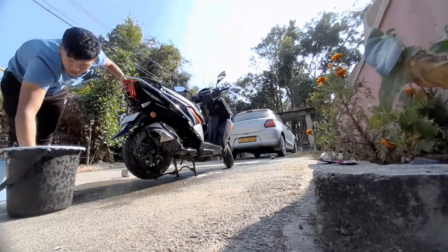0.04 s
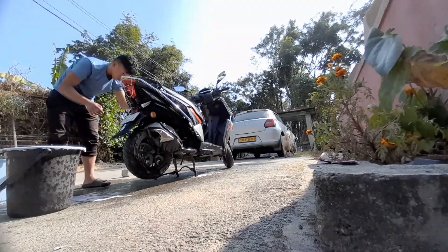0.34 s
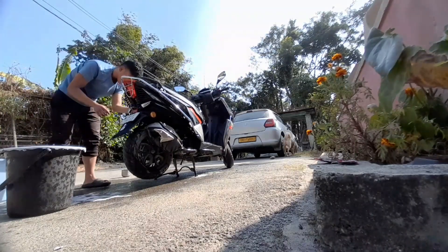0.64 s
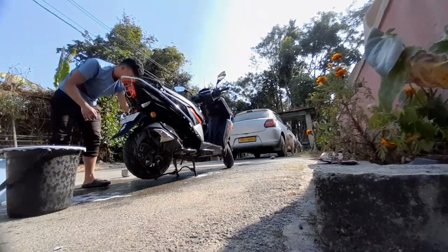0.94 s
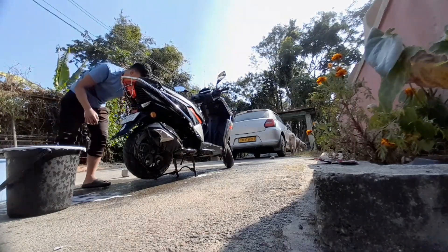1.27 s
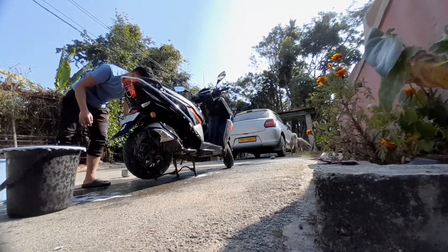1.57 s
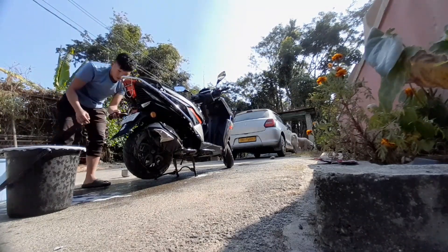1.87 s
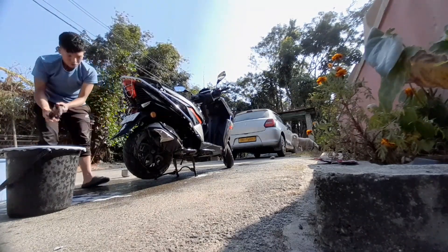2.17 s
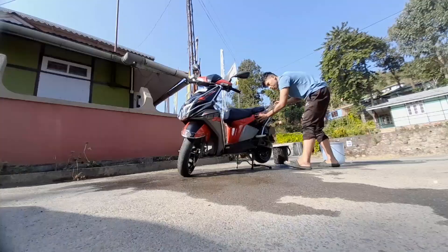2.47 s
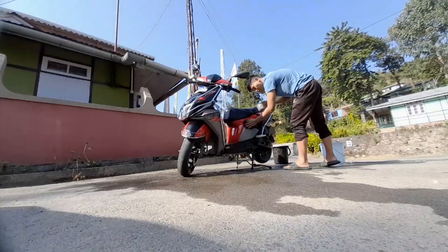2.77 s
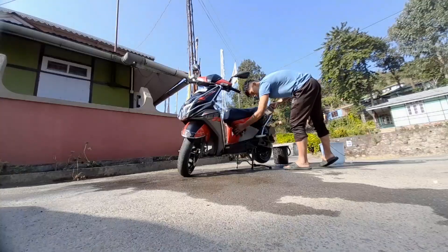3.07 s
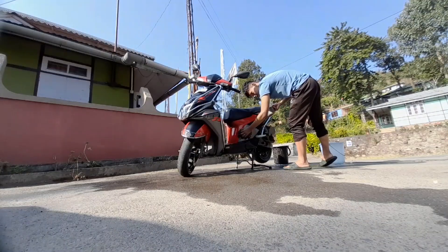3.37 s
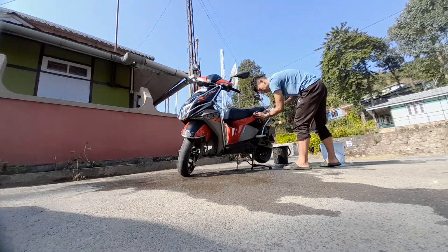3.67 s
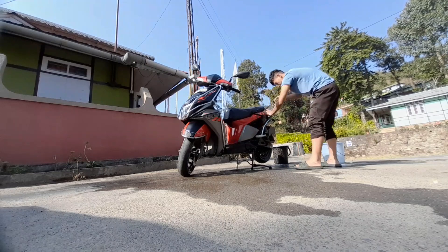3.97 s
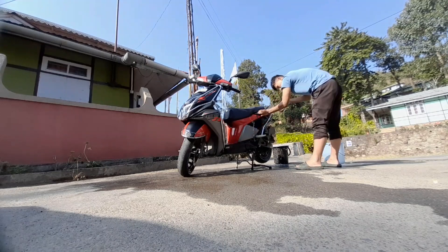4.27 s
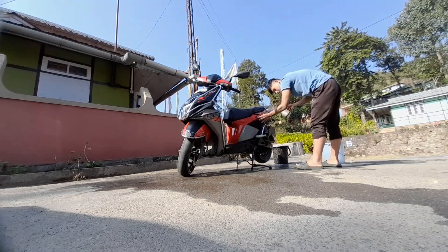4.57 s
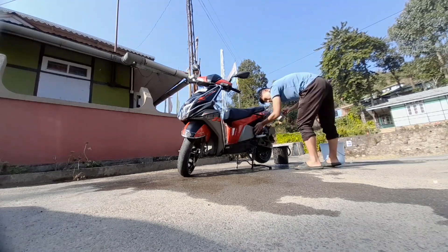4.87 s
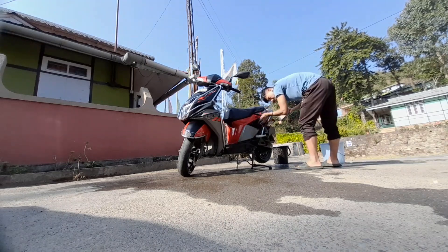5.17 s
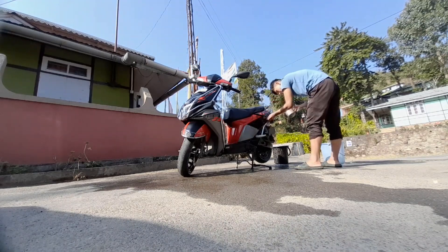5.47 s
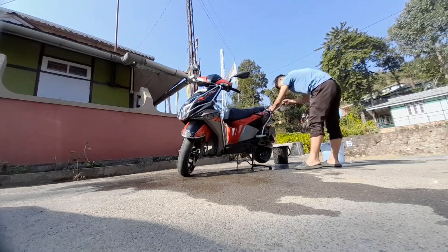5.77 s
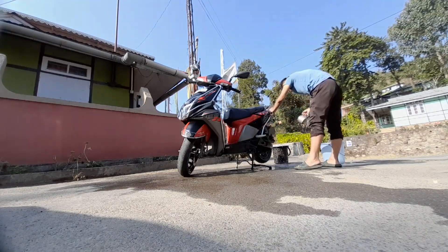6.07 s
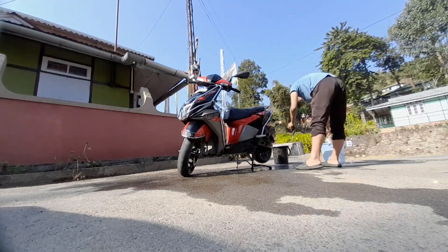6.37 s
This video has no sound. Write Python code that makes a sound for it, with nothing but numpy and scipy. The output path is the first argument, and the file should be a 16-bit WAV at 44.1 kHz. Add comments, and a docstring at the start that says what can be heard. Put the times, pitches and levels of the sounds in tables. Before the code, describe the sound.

A short churn of water in a nearby bucket opens a scooter wash in the open air. A hand then softly knocks and rubs the panels while drops tick and an insect buzzes faintly far off. Traffic cuts in abruptly and dominates: one deep engine slowly gathering speed, then a higher pulsing one, both over tyre noise. Small splashes hit the concrete meanwhile, and the engines recede at the end.

```python
"""Roadside scooter wash

A scooter is washed by hand, in three shots joined by hard cuts. Water sloshes and glugs in a near
bucket; then, in the quiet, drips tick, the wet panels are bumped and rubbed, and a far insect buzzes.
Last, two motor vehicles rumble past on exhaust tones and tyre rush while water splatters on concrete."""
import sys
import numpy as np
from scipy import signal
from scipy.fft import rfft, irfft
from scipy.io import wavfile

SR = 44100
rng = np.random.default_rng(int(sys.argv[2]) if len(sys.argv) > 2 else 0)


def pcm_store(signal):
    """Save signal as 16-bit PCM."""
    levels = np.round(np.clip(np.atleast_2d(signal), -1, 1) * 32767)
    wavfile.write(sys.argv[1], SR, levels.astype(np.int16).T)


N = 292383
T, HZ = np.arange(N) / SR, np.fft.rfftfreq(N, 1 / SR)
CUT_QUIET_S, CUT_ROAD_S = 0.2235, 2.438

# Water rocking in the bucket: crest time in seconds, period in seconds, mean level in dB, swing in dB.
SLOSH = (0.6, -0.2, -41, 1)
# Short ringing tones: the one at 1.062 s is the low body of the loudest panel bump, the rest are water
# glugs. Each row: start in seconds, level in dB, starting pitch in Hz.
SHORT_TONES = [(0.002, -40, 382), (0.067, -41.5, 243), (0.196, -44.5, 459), (0.939, -47, 728),
               (1.062, -37, 192.4), (1.378, -49, 621), (4.922, -35.5, 498), (5.949, -38, 570),
               (6.056, -42, 595)]
# Dull bumps and rubs on the panels. Each row: start in seconds, level in dB, ring in Hz,
# length in seconds, relative thud level in dB.
BUMPS = [(0.3, -66.5, 774, 0.12, -16), (0.697, -47.5, 423, 0.029, -3), (0.716, -57, 392, .07, 9),
         (0.782, -52, 460, 0.047, -8), (0.91, -49.5, 405, .036, -1), (0.962, -54.5, 433, 0.052, -6),
         (1.008, -50, 243, .055, -10), (1.04, -41.5, 247, 0.022, -1.5), (1.046, -47, 527, 0.062, -2),
         (1.069, -41.5, 202, 0.032, -8), (1.133, -52, 320, 0.048, -4), (1.191, -54.5, 335, 0.048, 5.5),
         (1.232, -55, 370, 0.041, 5.5), (1.331, -56, 357, 0.062, 3), (1.376, -55, 520, 0.027, -8),
         (1.468, -60, 364, 0.031, -12), (1.571, -53, 378, 0.026, 3), (1.588, -47.5, 158, 0.028, 6),
         (1.674, -60.5, 566, 0.053, -4), (2.337, -61, 279, 0.0086, 9), (5.226, -45, 865, 0.043, -10),
         (6.449, -55.5, 810, 0.019, -12)]
# Resonances of the plastic. Each row: centre in Hz, width in Hz, gain in dB.
PANEL_MODES = [(1270, 280, -2), (1690, 390, -0.5), (3800, 700, -4)]
# Water hitting concrete. Each row: start in seconds, level in dB, length in seconds,
# relative spray level in dB.
SPLATS = [(0.052, -46.5, 0.0091, -6.5), (0.22, -50.5, 0.0066, -3), (3.962, -51.5, 0.067, -6),
          (4.307, -55, 0.017, 2), (4.327, -45.5, 0.049, -4), (4.344, -46, 0.0058, -1.5),
          (4.392, -50.5, .034, 0.5), (4.47, -48, 0.014, 1), (4.481, -47, .026, -4),
          (4.618, -52, 0.041, -10), (4.784, -58, .04, -3), (4.882, -59.5, .02, -0.5),
          (6.084, -42, 0.01, -13), (6.094, -40, 0.026, -8), (6.115, -53.5, 0.08, -3), (6.232, -62, .058, 0),
          (6.349, -56, 0.043, -10)]
# The clearest drips. Each row: start in seconds, level in dB before EQ, centre in Hz.
DRIPS = [(0.264, -53, 4860), (0.289, -48.5, 6540), (0.456, -56, 3800), (0.625, -55.5, 8600),
         (0.776, -56.5, 9500), (1.934, -58, 3800), (2.165, -60.5, 4640), (2.578, -46.5, 7400),
         (3.612, -49.5, 11900), (4.154, -48.5, 5770), (4.347, -34.5, 7470), (5.07, -46.5, 7060),
         (6.253, -45, 5503), (6.435, -50, 7750), (6.588, -53.5, 7280)]
# Faint drips off the wet scooter: earliest start in seconds, mean level in dB before EQ, centre in Hz.
RUN_OFF = (3.1, -51.5, 5900)

# The deep engine. Each row: time in seconds, firing rate in Hz, firing tone level in dB.
DEEP_ENGINE = [(2.44, 59, -42), (2.5, 59.4, -33), (3.05, 59.75, -32.5), (3.22, 62.49, -28.5),
               (3.65, 63.04, -32.5), (3.87, 66.73, -30.5), (4.4, 71.44, -38.5), (4.75, 71.08, -33),
               (5.0, 72.1, -32), (5.7, 77.94, -34.5), (5.98, 78.4, -36), (6.1, 76.7, -47), (6.6, 75, -57)]
# The higher engine. Each row: time in seconds, firing rate in Hz.
HIGH_ENGINE = [(3.9, 111.9), (4.45, 123.2), (4.75, 120.4), (5.2, 127.5), (6.0, 133.2), (6.35, 131.1),
               (6.6, 122.3)]
# Exhaust overtones. Each row: multiple of the firing rate, relative level in dB.
DEEP_OVERTONES = [(3, -19.5), (4, -27), (5, -22.5), (6, -23.5), (7, -29)]
HIGH_OVERTONES = [(2, -13), (3, -17.5), (4, -26), (7, -32.5), (10, -33.5), (12, -32.5)]
# Swells of traffic noise. Each named row: crest in seconds, level in dB, seconds from crest to 3 dB down,
# dip on easing off in dB (negative lifts), loss on leaving in dB.
TRAFFIC = {"first roar": (2.5, -32.5, 0.98, 2.5, 13), "second roar": (5, -34.5, 0.93, -6, 8),
           "tyres": (3.5, -44.5, 1.39, 1.5, 14.5), "first whirr": (3, -55.5, 1.9, 22, 21),
           "second whirr": (5.05, -53, 0.47, 0, 12)}

# Tone colours of the water, traffic and outdoor air. Each row: frequency in Hz, relative density in dB.
SLOSH_COLOUR = [(30, -24), (70, -3), (105, -0.5), (180, -12), (255, -4), (350, -1), (560, -2), (880, -12),
                (2200, -18.5), (3300, -23.5), (6000, -29), (7700, -22), (8800, -35.5), (15000, -34)]
SPLAT_COLOUR = [(1200, -20), (2500, -9.5), (3600, 0), (5500, -2.5), (7600, 0.5), (8800, -18), (15500, -17)]
SPRAY_COLOUR = [(4000, -31), (6500, -11), (7700, 10.5), (8800, -0.5), (12000, 0), (15500, -5.5)]
ROAR_COLOUR = [(25, -18), (42, -17), (58, 2.5), (85, -3), (115, 6), (150, 0.5), (185, -3), (215, -8.5),
               (260, -3), (340, -8), (430, -11.5), (540, -19), (800, -33.5), (1600, -59)]
TYRE_COLOUR = [(250, -0.5), (520, 0.5), (650, 2.5), (780, 5.5), (1000, 0.5), (1250, -5.5), (1600, -3.5),
               (2200, -6.5), (3000, -8.5), (4200, -10.5), (5500, -14.5), (7600, -15.5), (8800, -30),
               (15000, -34)]
WHIRR_COLOUR = [(600, -16), (900, -13), (1060, -1.5), (1140, -1.5), (1240, 2), (1370, -3), (1540, -1),
                (1900, -4), (2400, -11), (4000, -48)]
HISS_COLOUR = [(1000, 6.5), (2500, 8), (5000, 0), (7500, 11.5), (8700, -5), (10000, 0), (15000, -5)]
AIR_COLOUR = [(30, -7.5), (70, 2.5), (115, 2.5), (200, -3.5), (330, -8.5), (670, -11), (960, -24.5),
              (1500, -23), (2500, -18), (3100, -20), (5500, -17.5), (7800, -18.5), (8800, -29),
              (15500, -28.5)]
# EQ on the drips. Each row: frequency in Hz, gain in dB.
DRIP_EQ = [(800, -5.0), (3000, -2.0), (7700, 3.5), (8800, -5.5), (15000, -0.5)]
# How alike diffuse sound is at the two microphones. Each row: frequency in Hz, correlation from 0 to 1.
COHERENCE = [(60, .995), (150, .98), (250, .85), (400, .6), (700, .3), (1300, 0), (15000, 0)]
# Stereo lean. Each row: frequency in Hz, left over right in dB.
ROAD_LEAN = [(100, 4), (380, 2), (1300, 3), (2400, 3), (4400, .5), (8100, 0), (15000, -7.5)]
BUCKET_LEAN = [(100, -4.5), (350, 4.5), (700, 0), (1300, 6), (2400, 5), (4400, 2.5), (8100, 0), (15000, -3)]
SPLAT_LEAN = [(3000, -0.5), (6500, 1.5), (9000, -2)]
SPRAY_LEAN = [(6500, 7), (9000, -11.5)]
# The insect's two swells. Each row: crest in seconds, level in dB, seconds from crest to 3 dB down.
INSECT_SWELLS = [(1.06, -69.5, 0.1), (2.12, -84, 1.5)]


def bucket():
    """A hand churns the bucket: a dense bright spatter over the gulping body of the water."""
    crest_s, period_s, mean_db, swing_db = SLOSH
    body_db = mean_db + swing_db * np.cos(2 * np.pi * (T - crest_s) / period_s)
    spatter_db = -45.5 + arch(peak_s=0.08, width_s=0.14)
    impacts = patter(per_s=5000, spread_db=4)
    water = field(SLOSH_COLOUR, BUCKET_LEAN, direct=0.51, lag_ms=-0.426, drive=impacts)
    body = irfft(rfft(water) / (1 + (HZ / 850) ** 6), N)  # the lows, below 850 Hz
    return unit(body) * amp(body_db) + unit(water - body) * amp(spatter_db)


def short_tones():
    """Brief rising, wobbling tones: air glugging in water, and the loudest bump's low ringing body."""
    out, t = np.zeros((2, N)), np.arange(SR // 5) / SR
    cycles, octaves_per_s = 10, 2.8
    for s, db, hz in SHORT_TONES:
        wobble = 0.6 * wander(50)[:len(t)]
        phase = 2 * np.pi * np.cumsum(hz * 2 ** (octaves_per_s * t)) / SR + wobble
        tone = np.sin(phase) + 0.1 * np.sin(2 * phase)
        same_shot = (s + t < CUT_QUIET_S) == (s < CUT_QUIET_S)  # opening tones end at the cut
        add(out, s, amp(db) * tone * swell(t, cycles / hz) * same_shot * pan(2.3))
    return out


def bumps():
    """The hand knocks and drags on the panels: a damped ring, a frame thud and a scuff in the plastic."""
    out, t = np.zeros((2, N)), np.arange(SR // 4) / SR
    dull = signal.butter(5, 850, fs=SR, output="sos")
    soft = signal.butter(3, 3800, fs=SR, output="sos")
    for s, db, hz, length_s, thud_db in BUMPS:
        centre, sides = rng.standard_normal(len(t)), rng.standard_normal((2, len(t)))
        body = unit(signal.sosfilt(dull, ring(centre + 0.65 * sides, hz, 0.33 * hz)))
        # the thud starts high and sags to the frame's low note, 78 Hz
        thud = np.sqrt(2) * np.sin(2 * np.pi * (78 * t + 1.39 * (1 - np.exp(-t / 0.0086))))
        plastic = sum(amp(gain) * ring(sides, f, width) for f, width, gain in PANEL_MODES)
        scuff = unit(signal.sosfilt(soft, plastic))
        # higher, longer and harder rubs scuff more
        scuff_db = -15 + 6 * np.log2(hz / 400) + 153 * (length_s - 0.05) + 0.6 * (db + 50)
        sound = body * pan(2.7) + amp(thud_db) * thud * pan(-2.2) + amp(scuff_db) * scuff * pan(4.7)
        add(out, s, amp(db) * sound * swell(t, length_s))
    return out


def splatters():
    """Each fling of water lands as a cloud of tiny impacts, with a finer spray towards the right."""
    slap_power = spray_power = 0
    for s, db, length_s, spray_db in SPLATS:
        shape = swell(np.maximum(T - s, 0), length_s)
        slap_power += (amp(db) * shape) ** 2
        spray_power += (amp(db + spray_db) * shape) ** 2
    drops = patter(per_s=4700, spread_db=7)
    slap = field(SPLAT_COLOUR, SPLAT_LEAN, direct=0.46, lag_ms=0.17, drive=drops)
    droplets = patter(per_s=5900, spread_db=12)
    spray = field(SPRAY_COLOUR, SPRAY_LEAN, direct=0.53, lag_ms=0.173, drive=droplets)
    return np.sqrt(slap_power) * slap + np.sqrt(spray_power) * spray


def drips():
    """Sharp ticks of single drops, each with a short wet tail."""
    out, t = np.zeros((2, N)), np.arange(SR // 20) / SR
    shape = swell(t, length_s=0.0026) + 0.29 * np.exp(-t / 0.026)
    for s, db, hz in DRIPS + list(run_off(count=9)):
        tick = ring(rng.standard_normal((2, len(t))), hz, 0.65 * hz) * shape
        add(out, s, amp(db) * tick * pan(-6 * np.log2(hz / 5000)))  # drips above 5 kHz sit right
    return irfft(rfft(out) * amp(over_frequency(DRIP_EQ)), N)


def run_off(count):
    """Water runs off the scooter: faint drips at loose intervals, scattered in level and pitch."""
    from_s, db, hz = RUN_OFF
    step_s = (N / SR - from_s) / count
    for k, (when, size, pitch) in enumerate(rng.random((count, 3))):
        yield from_s + step_s * (k + when), db + 5 * (size - 0.5), hz * 2 ** (0.6 * (pitch - 0.5))


def engines():
    """A deep engine slowly gathers speed; a higher one joins it, throbbing. Both waver in level."""
    deep, high = deep_engine(), high_engine()
    both = deep * (1 + 0.1 * wander(25)) + high * (1 + 0.15 * wander(14))
    return np.sqrt(2) * both * pan(1.1)


def deep_engine():
    """A low firing tone with exhaust overtones; its octave is strongest on the approach."""
    hz, tone_db = over_time(DEEP_ENGINE)
    octave_db = passing(peak_s=3.22, db=-31, width_s=1.0, ease_db=4.5, leave_db=10)
    phase, overtones = exhaust(hz, DEEP_OVERTONES, jitter_rad=0.095)
    return amp(tone_db) * (np.cos(phase) + overtones) + amp(octave_db) * np.cos(2 * phase)


def high_engine():
    """The firing tone carries far; the bark of the overtones stands out only while it is near."""
    enters_s, rise_s = 3.938, 0.18
    phase, overtones = exhaust(over_time(HIGH_ENGINE)[0], HIGH_OVERTONES, jitter_rad=0.11)
    tone = amp(-31 + arch(peak_s=4.4, width_s=0.94)) * np.cos(phase)
    bark = amp(-30.5 + arch(peak_s=4.89, width_s=0.54)) * overtones
    fade_in = np.clip((T - enters_s) / rise_s, 0, 1)
    return fade_in * throb(enters_s) * (tone + bark)


def throb(from_s):
    """The higher engine's level beats, faster and deeper as it goes by."""
    crest_s, rate_hz, quickening_hz_per_s = 5.97, 4.684, 1.04
    t = T - crest_s
    depth = np.clip(0.28 * (T - from_s), 0, 0.7)
    return 1 + depth * np.cos(2 * np.pi * (rate_hz * t + quickening_hz_per_s * t ** 2 / 2))


def exhaust(hz, orders, jitter_rad):
    """The firing phase and its overtones, each blurred a little by uneven firing."""
    phase = 2 * np.pi * np.cumsum(hz) / SR + jitter_rad * wander(20)
    return phase, sum(amp(db) * np.cos(k * (phase + jitter_rad * wander(4.5))) for k, db in orders)


def traffic_noise():
    """Ragged exhaust roar, tyre rush and a mechanical whirr swell and recede."""
    gain = {name: amp(passing(*row)) for name, row in TRAFFIC.items()}
    roar = field(ROAR_COLOUR, ROAD_LEAN) * amp(2.2 * wander(48))
    tyres = field(TYRE_COLOUR, ROAD_LEAN, direct=0.17, lag_ms=0.466) * amp(1.18 * wander(64))
    whirr = field(WHIRR_COLOUR, ROAD_LEAN, direct=0.39, lag_ms=-0.099) * amp(2.0 * wander(46))
    roar *= np.hypot(gain["first roar"], gain["second roar"])
    whirr *= np.hypot(gain["first whirr"], gain["second whirr"])
    return roar + tyres * gain["tyres"] + whirr


def passing(peak_s, db, width_s, ease_db, leave_db):
    """Pass-by level in dB: a swell, a dip as the first driver eases off, a drop out of earshot."""
    ease_s, ease_width_s = 3.033, 0.16
    leave_s, fade_s = 6.005, 0.31
    eased = np.exp(-((T - ease_s) / ease_width_s) ** 2)
    gone = 1 - np.exp(-np.maximum(T - leave_s, 0) / fade_s)
    return db + arch(peak_s, width_s) - ease_db * eased - leave_db * gone


def road_hiss():
    """A faintly crackling hiss beside the road."""
    crackle = patter(per_s=460, spread_db=8)
    hiss = field(HISS_COLOUR, ROAD_LEAN, direct=0.2, lag_ms=0.16, drive=crackle)
    return hiss * amp(-62.5 + 0.76 * wander(20.99))


def insect():
    """A thin, far-off buzz from the trees."""
    buzz = ring(rng.standard_normal((2, N)), hz=6300, width_hz=900)
    swells = sum(amp(db + arch(peak_s, width_s)) for peak_s, db, width_s in INSECT_SWELLS)
    return ring(buzz, hz=5740, width_hz=500) * swells


def air():
    """A soft bed of still outdoor air."""
    return amp(-63) * field(AIR_COLOUR, BUCKET_LEAN)


def field(colour, lean, direct=0, lag_ms=0, drive=None):
    """Coloured stereo noise: a diffuse part, alike in the bass, and a direct part later on the left."""
    left, other, source = rfft(rng.standard_normal((3, N)))
    if drive is not None:
        source = rfft(drive)
    alike = over_frequency(COHERENCE)
    diffuse = np.array([left, alike * left + np.sqrt(1 - alike ** 2) * other])
    aimed = np.array([source * np.exp(-2j * np.pi * HZ * lag_ms / 1000), source])
    spectrum = np.sqrt(1 - direct) * diffuse + np.sqrt(direct) * aimed
    eq_db = over_frequency(colour) + np.outer([0.5, -0.5], over_frequency(lean))
    x = irfft(spectrum * amp(eq_db), N)
    return x / x.mean(0).std()


def patter(per_s, spread_db):
    """Random impacts of very unequal strength."""
    strength = amp(spread_db * np.minimum(rng.exponential(1, N), 4)) * rng.choice([-1, 1], N)
    return unit(strength * (rng.random(N) < per_s / SR))


def ring(x, hz, width_hz):
    """One resonance, at rms 1."""
    return unit(signal.lfilter(*signal.iirpeak(hz, hz / width_hz, SR), x))


def wander(hz):
    """Random drift of rms 1, up to about hz."""
    return unit(irfft(rfft(rng.standard_normal(N)) * np.exp(-(HZ / hz) ** 2), N))


def swell(t, length_s):
    """A soft push that peaks at a third of its length and dies away."""
    u = 3 * t / length_s
    return u * np.exp(1 - u)


def arch(peak_s, width_s):
    """A level that rises to 0 dB at peak_s and is 3 dB down width_s to either side."""
    return -10 * np.log10(2) * ((T - peak_s) / width_s) ** 2


def over_frequency(points):
    """A curve over log frequency, at every bin."""
    hz, value = np.transpose(points)
    return np.interp(np.log(HZ + 1), np.log(hz + 1), value)


def over_time(rows):
    """Each column of a table as an automation curve."""
    s, *columns = np.transpose(rows)
    return [np.interp(T, s, column) for column in columns]


def add(mix, s, sound):
    """Mixes a stereo sound in at time s."""
    part = mix[:, round(s * SR):][:, :sound.shape[1]]
    part += sound[:, :part.shape[1]]


def pan(db):
    """Stereo gains, the left louder by db."""
    return amp([[db / 2], [-db / 2]])


def amp(db):
    """Decibels to gain."""
    return 10 ** (np.asarray(db) / 20)


def unit(x):
    """Scales to rms 1."""
    return x / np.sqrt(np.mean(x ** 2) + 1e-20)


def scene():
    """Bucket, quiet and road follow each other without a fade."""
    ambience = air() + insect() * (T < CUT_ROAD_S)
    washing = bucket() * (T < CUT_QUIET_S) + short_tones() + bumps() + splatters() + drips()
    road = (engines() + traffic_noise() + road_hiss()) * (T > CUT_ROAD_S)
    return ambience + washing + road


def record(dry):
    """The recorder rolls off the top above 15.7 kHz."""
    lowpass = signal.firwin(401, 15700, window=("kaiser", 9), fs=SR)
    return signal.oaconvolve(dry, lowpass[None], "same")


dry = scene()
out = record(dry)
pcm_store(out)
```